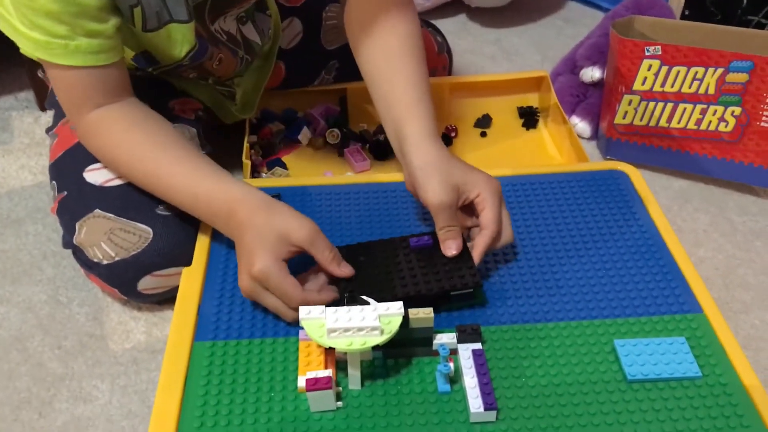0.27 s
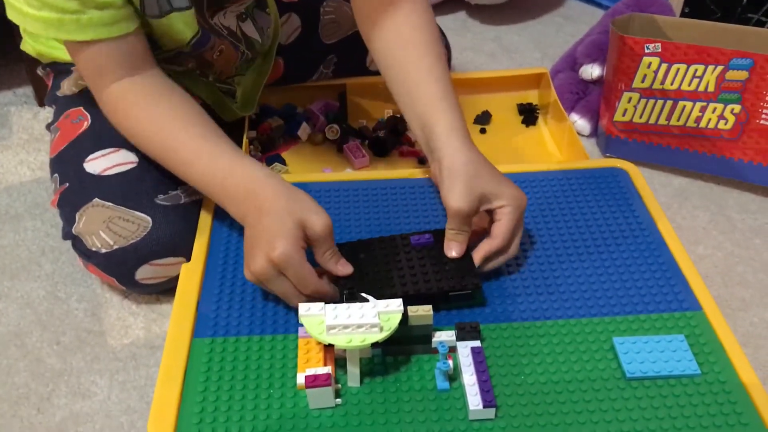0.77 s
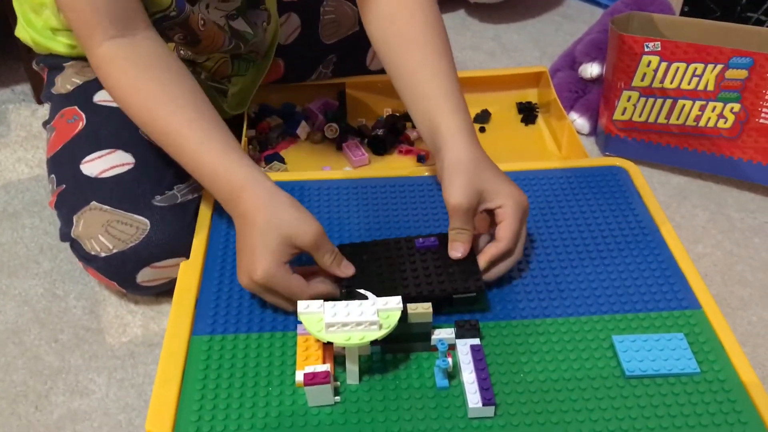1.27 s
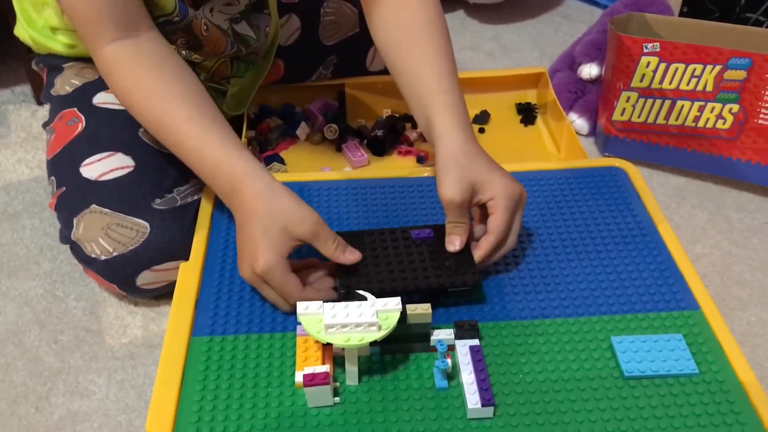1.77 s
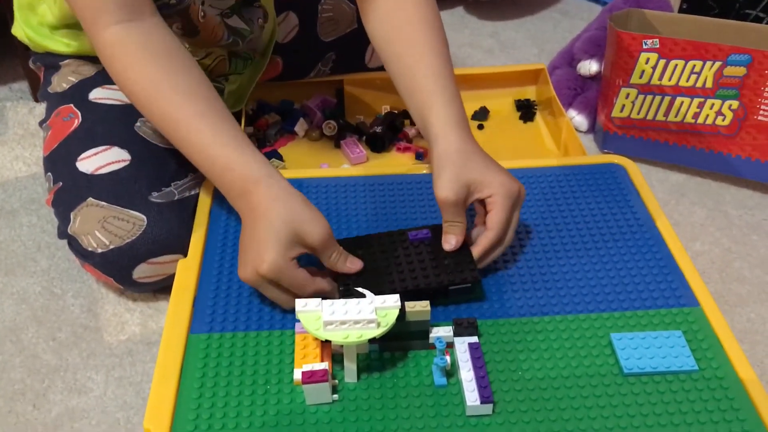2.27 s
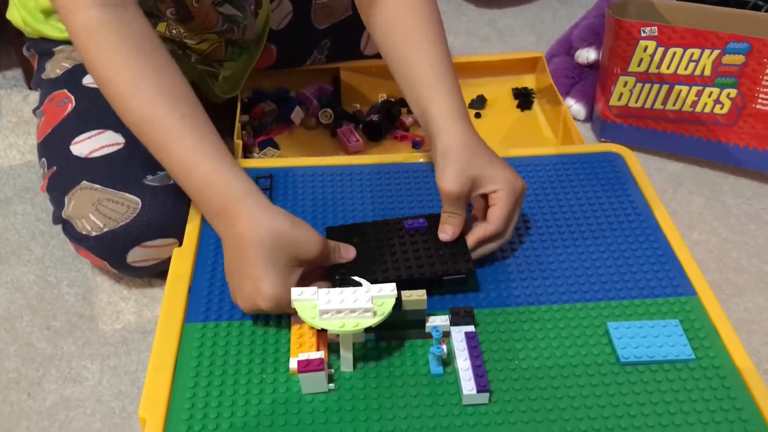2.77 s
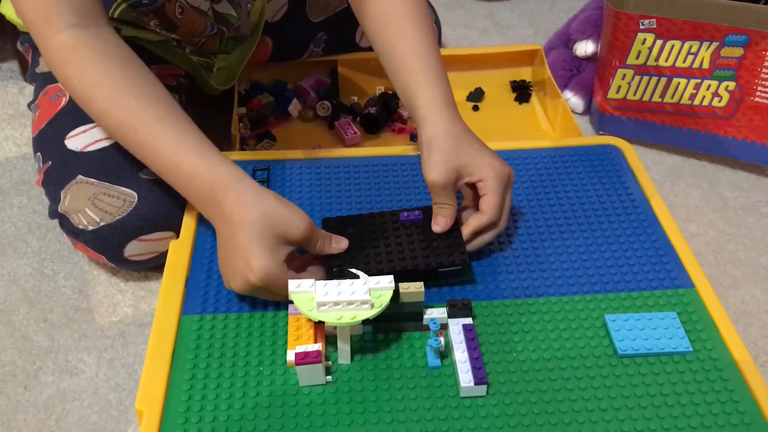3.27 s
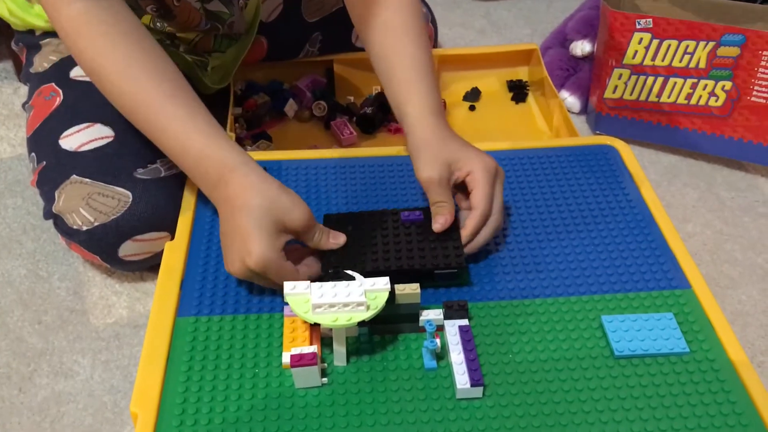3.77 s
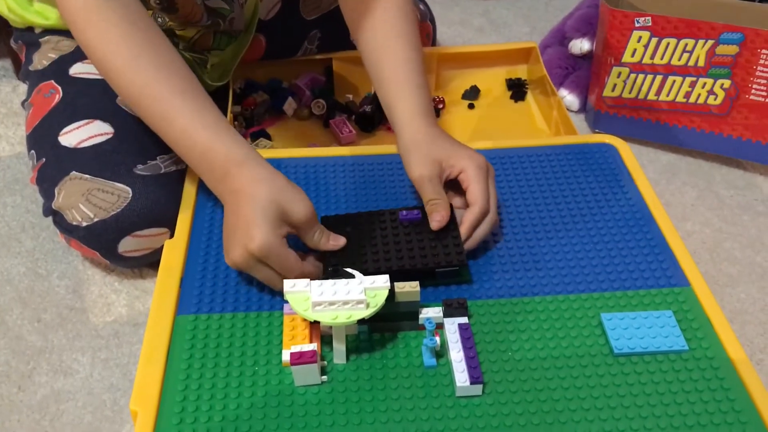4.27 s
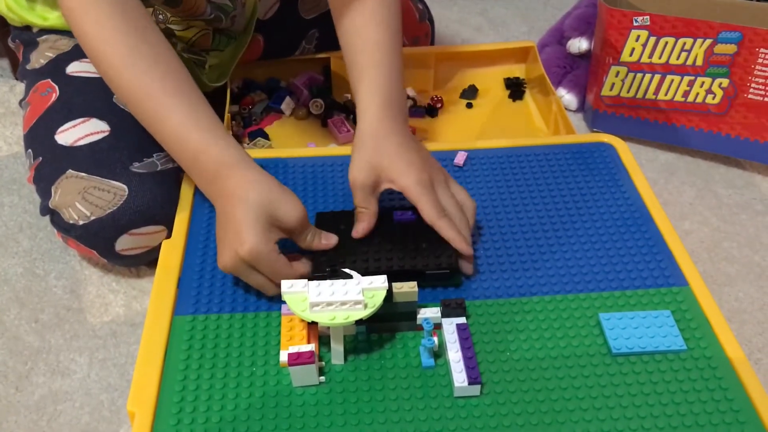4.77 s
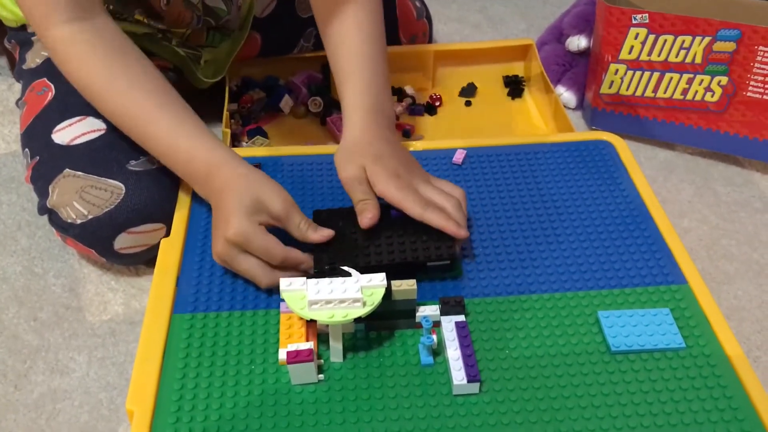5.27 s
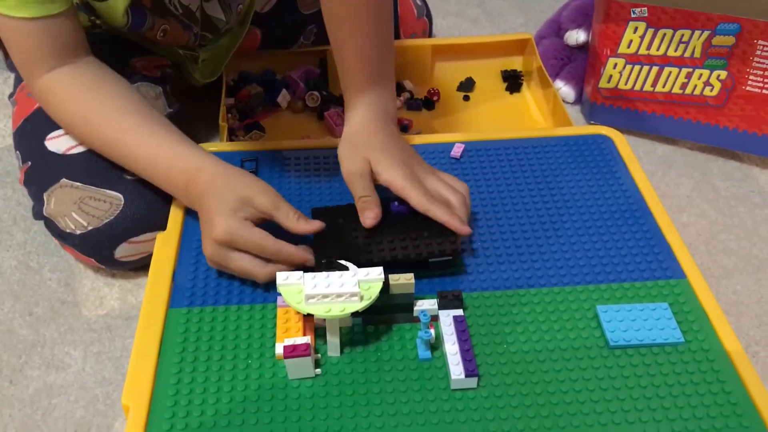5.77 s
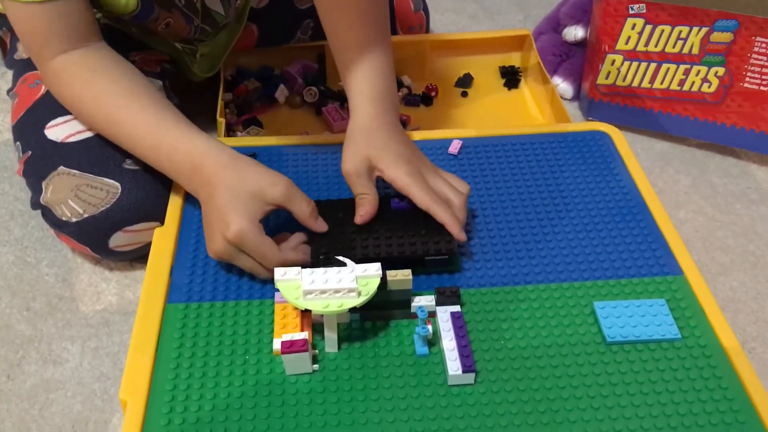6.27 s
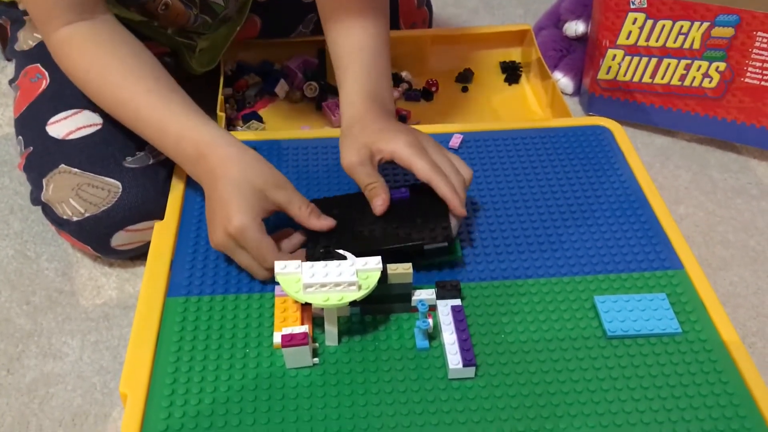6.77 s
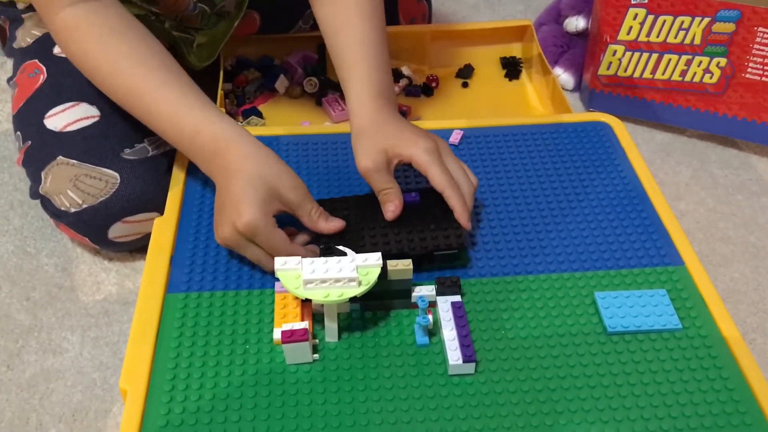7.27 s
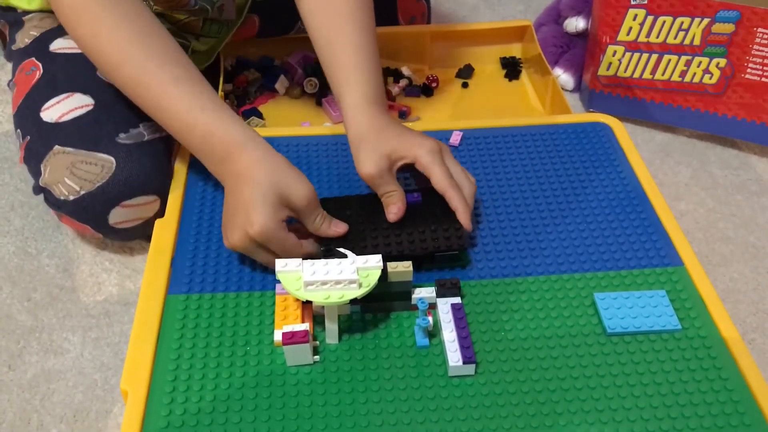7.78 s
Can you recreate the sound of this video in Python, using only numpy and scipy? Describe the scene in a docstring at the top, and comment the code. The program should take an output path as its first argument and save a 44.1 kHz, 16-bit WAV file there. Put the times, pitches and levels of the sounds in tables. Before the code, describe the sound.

Close to the microphone in a quiet carpeted room, hands work a plastic building plate against bricks on a hollow play table. A few light clicks and a brief scrape open the sound, with a moderate clack at 0.7 s. From 0.9 to 1.3 s comes a dense burst of loud hollow clacks and snaps. Small ticks and faint rubbing follow, with a crisp double click at 2.1 s. From 2.5 to 3.8 s it is nearly still, only faint touches over soft hiss. Medium knocks return at 3.8 to 4.0 s, then a firmer, duller cluster with a short scrape at 4.5 to 4.8 s. Quiet fidgeting leads to moderate clicks around 5.8 s and light ticking near 6.7 to 7 s. Two hard, bright clacks stand out at 7.5 and 7.7 s, before faint final ticks. Low hand bumps and a tiny loose-brick patter accompany the knocks.

```python
"""Sharp plastic clicks: a child works a building plate onto the studded top of a hollow play table.
Each contact sums four struck parts with damped modes: table thump, plate clack, brick-wall snap, stud tick.
Loose bricks in the tray patter after each knock (sparse decaying noise).
Between clicks the plate hisses over the studs; hands lean on the table and sway it (coloured noise).
A short tail of a carpeted room and a faint hiss lie behind everything."""
import sys
import numpy as np
from scipy import signal
from scipy.fft import rfft, irfft
from scipy.io import wavfile

SR = 44100
rng = np.random.default_rng(int(sys.argv[2]) if len(sys.argv) > 2 else 0)


def master(y):
    """Save y as 16-bit WAV."""
    cut = np.clip(np.atleast_2d(y).T, -1, 1)
    pcm = np.round(cut * 32767)  # scale
    wavfile.write(sys.argv[1], SR, pcm.astype(np.int16))


N = 354608
AGE_S = np.arange(-SR // 250, SR // 4) / SR   # time since a contact
LEAD = np.sum(AGE_S < 0)   # samples before the contact


def from_db(db):
    """Decibels to amplitude gain."""
    return 10 ** (np.asarray(db) / 20)


def rms_one(x):
    """Scale to rms 1."""
    return x / np.sqrt(np.mean(x ** 2) + 1e-20)


def attack_one(x, span_s):
    """Scale a blow to rms 1 over its first span."""
    return x / np.sqrt(np.mean(x[:int(span_s * SR)] ** 2) + 1e-20)


def decay(age_s, t60_s):
    """Exponential decay, 60 dB down after t60."""
    return np.exp(-np.log(1000) * age_s / t60_s)


def at_hz(points, hz):
    """Interpolate a table on a log-frequency axis."""
    freqs, values = np.transpose(points)
    return np.interp(np.log(np.maximum(hz, 1)), np.log(freqs), values)


def band(x, low_hz, high_hz, order=2):
    """Causal Butterworth band-pass."""
    edges_hz = [low_hz, min(high_hz, .45 * SR)]
    sos = signal.butter(order, edges_hz, "band", fs=SR, output="sos")
    return signal.sosfilt(sos, x + 1e-18)


def coloured(x, spectrum):
    """Shape the spectrum of a signal; rms 1."""
    hz = np.arange(N // 2 + 1) * SR / N
    return rms_one(irfft(rfft(x) * from_db(at_hz(spectrum, hz)), N))


AIR_DB = -67
# still room and microphone hiss: (frequency [Hz], relative density [dB per Hz])
AIR_COLOUR = [(22, -25.5), (42, -6.5), (100, 4), (200, -12.5), (440, -18.5), (860, -24.5), (1900, -24),
              (3200, -26.5), (9000, -31), (10500, -31.5), (15800, -37.5)]


def air():
    """Steady coloured noise of the still room and the microphone."""
    return from_db(AIR_DB) * coloured(rng.standard_normal(N), AIR_COLOUR)


ROOM_T60_S, ABSORB_HZ = 0.19, 19710   # low-frequency t60; frequency where it is halved
# room echo energy over the direct sound: (frequency [Hz], level [dB])
ROOM_ECHO = [(100, -15), (400, -12.5), (1300, -11.5), (3500, -10.5), (8000, -13), (15000, -18)]


def room(x, first_echo_s, build_s):
    """Echoes from floor, furniture and walls thicken into a short tail that dies sooner in the treble."""
    age_s = np.arange(SR // 2) / SR
    onset = 1 - np.exp(-np.maximum(age_s - first_echo_s, 0) / build_s)
    edges_hz = np.geomspace(70, 18000, 13)
    tail = 0
    for low_hz, high_hz in zip(edges_hz, edges_hz[1:]):
        hz = np.sqrt(low_hz * high_hz)
        t60_s = ROOM_T60_S / (1 + hz / ABSORB_HZ)
        echoes = band(rng.standard_normal(len(age_s)), low_hz, high_hz) * onset * decay(age_s, t60_s)
        unit_gain = np.sqrt(2 * (high_hz - low_hz) / SR / np.sum(echoes ** 2))
        tail = tail + echoes * from_db(at_hz(ROOM_ECHO, hz)) * unit_gain
    return signal.fftconvolve(x, tail)[:N]


FIRM_DB, PRESS_FOLLOWS = -36.5, 0.38   # strength of a firm click; dB of pressure per dB of strength
PRESS_ATTACK_S = 0.054


def pressure(release_s):
    """Weight of the hands, 1 at a firm click: builds up to each click, lets go after it."""
    s, strength_db = np.transpose(CONTACTS)[:2, :, None]
    t = np.arange(0, N, 100) / SR   # coarse grid
    peak = from_db(PRESS_FOLLOWS * (strength_db - FIRM_DB))
    presses = peak * np.exp(np.minimum((t - s) / PRESS_ATTACK_S, (s - t) / release_s))
    return np.interp(np.arange(N) / SR, t, presses.max(axis=0))


SWAY_DB, RESTING_SWAY_DB, SWAY_SETTLE_S = -62.5, -70, 0.13
# swaying: (frequency [Hz], relative density [dB per Hz])
SWAY_SPECTRUM = [(20, -28), (45, -3.5), (80, 0), (115, -5), (170, -7), (300, -26), (600, -49)]


def sway():
    """The table sways on the carpet under the hands and settles slowly: low noise follows pressure."""
    gain = from_db(RESTING_SWAY_DB) + from_db(SWAY_DB) * pressure(SWAY_SETTLE_S)
    return gain * coloured(rng.standard_normal(N), SWAY_SPECTRUM)


LEAN_DB, RESTING_HANDS_DB, PRESS_RELEASE_S = -66, -80, 0.21
SLIDE_PUSH_DB = 6.5   # table rumble over the hiss of a slide
# leaning: (frequency [Hz], relative density [dB per Hz])
LEAN_SPECTRUM = [(30, -14.5), (85, -1), (150, 3.5), (280, 1), (550, -9.5), (1200, -15.5), (2500, -34)]


def lean():
    """Hands lean on the table: low noise and uneven bumps follow pressure and sliding."""
    # knuckles and palms touch down 70 times a second on average
    bumps = rms_one(rng.standard_normal(N) * (rng.random(N) < 70 / SR))
    weight = from_db(RESTING_HANDS_DB) + from_db(LEAN_DB) * pressure(PRESS_RELEASE_S)
    weight = weight + from_db(SLIDE_PUSH_DB) * sliding()
    return weight * coloured(bumps + from_db(-0.5) * rng.standard_normal(N), LEAN_SPECTRUM)


def swell(start_s, length_s, attack_s, release_s):
    """Exponential rise to full at the start, hold, exponential release."""
    t = np.arange(N) / SR - start_s
    exponent = np.minimum(np.minimum(t / attack_s, (length_s - t) / release_s), 0)
    return np.exp(exponent.clip(-30))


SLIDE_ATTACK_S, SLIDE_RELEASE_S, RESTING_FINGERS_DB = 0.035, 0.06, -86.5
# slides of the plate over the studs: (time [s], length [s], level [dB])
SLIDE_EVENTS = [(0.0, 0.02, -64), (0.658, 0.31, -76.5), (1.4, 0.59, -80.5), (2.27, 0.18, -78.5),
                (3.721, 0.26, -82), (4.39, 0.22, -78), (4.591, 0.053, -64.5), (5.425, 0.36, -74.5),
                (5.67, 0.092, -81), (6.503, 0.32, -78.5), (7.082, 0.36, -80.5), (7.516, 0.17, -72.5),
                (7.987, 0.06, -72)]


def sliding():
    """Rubbing gain: one swell per slide, over fingers that never quite rest."""
    swells = [from_db(db) * swell(s, length_s, SLIDE_ATTACK_S, SLIDE_RELEASE_S)
              for s, length_s, db in SLIDE_EVENTS]
    return from_db(RESTING_FINGERS_DB) + np.max(swells, axis=0)


TRIPS_PER_S, TRIP_DB, TRIP_HARDNESS_DB, TRIP_SPREAD_DB = 7, -65, 5, 1.5


def trips(count=400):
    """The plate's edge trips over single studs in a slide: faint random contacts, rows as in CONTACTS."""
    s = rng.random(count) * N / SR
    chance = rng.random(count)
    touch = [TRIP_DB, TRIP_HARDNESS_DB, 0] + TRIP_SPREAD_DB * rng.standard_normal((count, 3))
    moving = np.any([(s > start_s) & (s < start_s + length_s)
                     for start_s, length_s, db in SLIDE_EVENTS], axis=0)
    kept = moving & (chance < TRIPS_PER_S * N / SR / count)
    return np.column_stack([s, touch])[kept]


def stutter(spread_s, lead_s, slips_db):
    """Studs give way in a flurry of tiny slips around the main one, which comes at age 0."""
    age_s = AGE_S[:SR // 40]
    envelope = np.exp(np.where(age_s < 0, age_s / lead_s, -age_s / spread_s))
    flurry = rng.standard_normal(len(age_s)) * envelope
    return 1.0 * (age_s == 0) + from_db(slips_db) * flurry / np.sqrt(np.sum(flurry ** 2))


# rubbing: (frequency [Hz], relative density [dB per Hz])
RUB_SPECTRUM = [(200, -3.5), (600, 2), (1200, 6.5), (2600, -4), (4500, 0.5), (7000, -5.5), (9500, -5),
                (10800, -10.5), (16000, -19)]


def fingers(catches_per_s, spread_db, smooth_db):
    """Skin and plastic hiss softly and catch on the studs: noise plus tiny scrapes in six pitch bands."""
    catches = 0
    for hz in np.geomspace(500, 9000, 6):
        size_db = spread_db * np.minimum(rng.exponential(1, N), 3.5)
        sizes = from_db(size_db) * rng.choice([-1, 1], N)
        hits = sizes * (rng.random(N) < catches_per_s / SR)   # rate per band
        scrape = stutter(spread_s=0.0035, lead_s=0.0014, slips_db=8)
        scrape = band(scrape, hz / np.sqrt(2), hz * np.sqrt(2))
        catches = catches + signal.oaconvolve(hits, scrape)[:N]
    rubbing = rms_one(catches) + from_db(smooth_db) * rng.standard_normal(N)
    return sliding() * coloured(rubbing, RUB_SPECTRUM)


JIGGLE_DB, JIGGLE_T60_S, JIGGLES_PER_S = -26, 0.66, 900
JIGGLE_LOW_HZ, JIGGLE_HIGH_HZ = 760, 1750


def tray(knocks):
    """Loose bricks jiggle on after a knock: a dying patter of tiny touches."""
    age_s = np.arange(SR // 2) / SR
    touches = rng.standard_normal(len(age_s)) * (rng.random(len(age_s)) < JIGGLES_PER_S / SR)
    patter = band(touches * decay(age_s, JIGGLE_T60_S), JIGGLE_LOW_HZ, JIGGLE_HIGH_HZ)
    patter = patter * np.sqrt(2 * (JIGGLE_HIGH_HZ - JIGGLE_LOW_HZ) / SR / np.sum(patter ** 2))
    return from_db(JIGGLE_DB) * signal.fftconvolve(knocks, patter)[:N]


# the smaller a part, the more a hard contact favours it; a loose plate clacks and shakes its walls too
PLATE_DB, WALLS_DB, STUDS_DB = -3.5, -8.5, -11.5   # over the table thump
PLATE_PER_HARDNESS, WALLS_PER_HARDNESS, WALLS_PER_LOOSENESS = 0.35, 0.86, 0.4   # dB per dB


def part_levels(strength_db, hardness_db, loose_db):
    """Share out a contact: dB of table thump, plate clack, wall snap, stud tick."""
    clack_db = strength_db + PLATE_DB + PLATE_PER_HARDNESS * hardness_db + loose_db
    snap_db = strength_db + WALLS_DB + WALLS_PER_HARDNESS * hardness_db + WALLS_PER_LOOSENESS * loose_db
    tick_db = strength_db + STUDS_DB + hardness_db
    return strength_db, clack_db, snap_db, tick_db


def blow(force, modes, span_s, low_hz, high_hz, crack_db, scatter_db, detune, travel_s, rise_s):
    """One contact on one part: a brief crack, then its modes. Rows: to the microphone, into the room."""
    hz, level_db, t60_s = np.transpose(modes)[:, :, None]
    strength = from_db(level_db + scatter_db * rng.standard_normal(hz.shape)) * rng.choice([-1, 1], hz.shape)
    grip = 1 + detune * rng.standard_normal(hz.shape)   # pressing fingers detune the part
    time_s = np.arange(min(int(1.2 * t60_s.max() * SR), len(AGE_S))) / SR
    age_s = np.maximum(time_s - travel_s * np.sqrt(hz[0] / hz), 0)   # low bending waves travel slowest
    rise = 1 - np.exp(-age_s / rise_s)
    tones = np.sin(2 * np.pi * hz * grip * age_s)
    ring = np.sum(strength * rise * decay(age_s, t60_s) * tones, axis=0)
    crack = attack_one(band(1.0 * (time_s == 0), low_hz, high_hz, order=3), span_s)
    near = signal.fftconvolve(force, attack_one(ring, span_s) + from_db(crack_db) * crack)
    near = np.pad(near, (0, len(AGE_S)))[:len(AGE_S)]
    near = near / np.sqrt(np.sum(near[AGE_S < span_s] ** 2) / (span_s * SR))
    # over all directions, the peaks and dips of the modes partly even out
    even = np.pad(crack, (LEAD, len(AGE_S)))[:len(AGE_S)]
    return np.array([near, (even + near) / np.sqrt(2)])


# modes of the hollow table: (frequency [Hz], relative level [dB], t60 [s])
TABLE_MODES = [(91.6, -20, 0.058), (168, -9, 0.13), (220.7, 1.5, 0.062), (261, 3, 0.043), (320, -8, 0.049),
               (392.7, -10, 0.065), (437, -8.5, 0.056), (466, -6.5, 0.029), (564, -5, 0.059),
               (611, -11, .05)]
# modes of the building plate: (frequency [Hz], relative level [dB], t60 [s])
PLATE_MODES = [(804, -3.5, 0.087), (895, -7.5, 0.0588), (972, -3.5, .05), (1104, -2, 0.054),
               (1147, -2, 0.064), (1233, 3, 0.036), (1305, -7, 0.091), (1370, -10, 0.024), (1650, 3, 0.035),
               (1898, -0.5, 0.021), (2090, -12.5, 0.048)]
# modes of the brick walls: (frequency [Hz], relative level [dB], t60 [s])
WALL_MODES = [(2318, -6.5, 0.038), (2476, -1.5, 0.012), (2710, -5, 0.012), (3030, -4, 0.013),
              (3136, 5, 0.011), (3380, -2, 0.022), (3500, -3.5, 0.019), (4480, -2.5, 0.0085)]
# modes of the studs and small parts: (frequency [Hz], relative level [dB], t60 [s])
STUD_MODES = [(4900, 0, 0.014), (5470, 4, 0.014), (6620, 5, .009), (6660, 2, 0.014), (8160, -7, 0.013),
              (8140, -9.5, 0.0092), (8640, -5, 0.0022), (9750, -4.5, 0.012), (11000, -9.5, 0.0047),
              (12950, -9, .006), (14800, -2.5, 0.00604)]
# plastic on plastic: (time [s], strength [dB], hardness [dB], plate looseness [dB])
# hardness: low for a cushioned push, high for a stud snapping home
CONTACTS = [(0.003,-54,9,5), (0.0183,-45.5,0.5,6), (0.0489,-52,11,8), (0.0544,-40.5,0,0),
            (0.1748,-54,-9,-5), (0.3111,-70.5,7,1), (0.509,-48,-1.5,-1), (0.5158,-65,28,4),
            (0.5309,-63.5,22.5,5.5), (0.694,-59.5,3.5,-7), (0.7361,-41,-3,6.5), (0.878,-70,16,1),
            (0.9184,-37.5,6,-10.5), (0.9255,-30.5,-0.5,12.5), (0.939,-26,-3.5,6.5), (0.9436,-43.5,16,9),
            (0.972,-55,19,3), (0.9842,-37.5,-2,-4), (1.002,-41,-0.5,6), (1.0287,-43.5,1.5,-1),
            (1.1195,-54.5,8,-9), (1.234,-47,9,2.5), (1.245,-32.5,-2.5,7), (1.257,-52,14,10),
            (1.2956,-37,4.5,3.5), (1.4415,-49.5,-9.5,-8), (1.4826,-57.5,-7.5,3.5), (1.513,-71,19,-17),
            (1.607,-59.5,6.5,-10), (1.6858,-58.5,-1,1), (1.72,-57,7.5,-10), (1.7521,-49.5,1.5,5),
            (1.773,-53.5,12,-2.5), (1.8831,-64.5,9,6), (1.967,-47.5,-6.5,7.5), (2.1271,-39.5,11.5,-14),
            (2.1292,-34,-2,0), (2.356,-54.5,-27,-12), (2.378,-60.5,5,-25), (2.4101,-49.5,-4.5,1),
            (2.6765,-60,8,-8.5), (2.9484,-65.5,-11,5), (3.344,-62.5,0,3.5), (3.5671,-69,2,1.5),
            (3.812,-52.5,-1,-1), (3.8406,-42,-2,-2), (3.9747,-48,-16,0.5), (4.0036,-41,-10,-3),
            (4.203,-60,-10.5,-12.5), (4.363,-55,-6,-8.5), (4.4783,-47,0,7.5), (4.4848,-37,-0.5,5.5),
            (4.5999,-50,-22,3), (4.6183,-50,7,-4), (4.66,-55.5,9,1.5), (4.6671,-47.5,-2,2),
            (4.7071,-32,-13,-3), (4.7155,-32.5,-4,3.5), (4.7785,-42,-11,7), (5.1355,-69,14.5,6),
            (5.2062,-54,-18,-2.5), (5.322,-59,8.5,-14), (5.4818,-56,10.5,-27), (5.5294,-50.5,-8.5,0.5),
            (5.7164,-55,-1.5,8.5), (5.7459,-59.5,13.5,9.5), (5.8148,-44,2,3), (5.8433,-39,3,-3.5),
            (5.8998,-40,-8.5,-2), (6.0719,-53,-2.5,8), (6.24,-63.5,-4,10), (6.4586,-63.5,-12,2.5),
            (6.7092,-54.5,10.5,-6), (6.7298,-61,18.5,2), (6.759,-53,10,6.5), (6.778,-58.5,10.5,-1),
            (6.8747,-59.5,-4.5,8), (6.975,-47,13.5,-18.5), (6.991,-55,9.5,-12.5), (7.1346,-61.5,6.5,-11),
            (7.206,-55.5,-18,7), (7.291,-65,-13,13), (7.3201,-48.5,-33,5.5), (7.5185,-27,4.5,11),
            (7.6977,-24,3.5,-1), (7.7116,-40.5,0,1.5), (7.8283,-60.5,0,5), (7.948,-56.5,1.5,-8),
            (7.9956,-48.5,4.5,0)]


def bricks():
    """Every contact shakes table, plate, walls and studs. Rows: to the microphone, into the room."""
    out = np.zeros((2, N + 2 * len(AGE_S)))
    slow_s, quick_s = .02, .008   # spans over which levels hold
    for s, strength_db, hardness_db, loose_db in [*CONTACTS, *trips()]:
        thump_db, clack_db, snap_db, tick_db = part_levels(strength_db, hardness_db, loose_db)
        slap_db = np.clip((clack_db + 34.5) / 2, 0, 7)   # a hard blow slaps the plate down in one go
        push = stutter(spread_s=0.0032, lead_s=0.00045, slips_db=-7.5 - slap_db)
        slips = stutter(spread_s=.0025, lead_s=.0008, slips_db=2 - slap_db)
        thump = blow(push, TABLE_MODES, slow_s, 200, 570, crack_db=-6.0, scatter_db=4.0,
                     detune=0.014, travel_s=.006, rise_s=0.0017)
        clack = blow(push, PLATE_MODES, quick_s, 820, 1850, crack_db=slap_db - 1.5, scatter_db=6.5,
                     detune=0.014, travel_s=0.00061, rise_s=0.00041)
        snap = blow(slips, WALL_MODES, quick_s, 2200, 3600, crack_db=2, scatter_db=3.5,
                    detune=.03, travel_s=.0002, rise_s=.0003)
        tick = blow(slips, STUD_MODES, quick_s, 5500, 11200, crack_db=2, scatter_db=3,
                    detune=.03, travel_s=.0001, rise_s=.0002)
        contact = from_db(thump_db) * thump + from_db(clack_db) * clack
        contact = contact + from_db(snap_db) * snap + from_db(tick_db) * tick
        at = max(round(s * SR), 0)
        out[:, at:at + len(AGE_S)] += contact
    return out[:, LEAD:LEAD + N]


def scene():
    """Clicks and handling sounds close by, in a quiet room."""
    rub = fingers(catches_per_s=48, spread_db=5.0, smooth_db=-5.0)
    direct, spread = bricks() + rub + lean() + sway()
    echoes = room(spread, first_echo_s=0.0042, build_s=0.0019)
    return (direct + echoes + tray(spread) + air())[None]


CUTOFF_HZ = 16100


def record(dry):
    """The microphone drops the deepest bass and dips narrowly in the treble; the top is cut steeply."""
    thin = signal.sosfilt(signal.butter(2, 32, "high", fs=SR, output="sos"), dry)
    dipped = thin - .5 * signal.lfilter(*signal.iirpeak(10600, 10, fs=SR), thin)
    return signal.sosfilt(signal.ellip(10, .1, 80, CUTOFF_HZ, fs=SR, output="sos"), dipped)


dry = scene()
out = record(dry)
master(out)
```